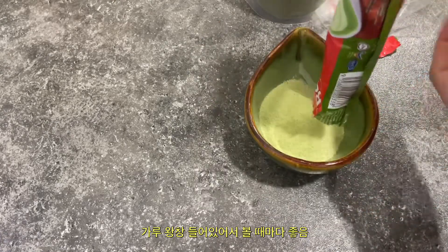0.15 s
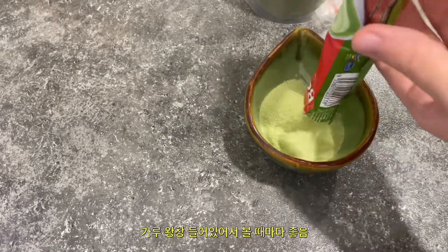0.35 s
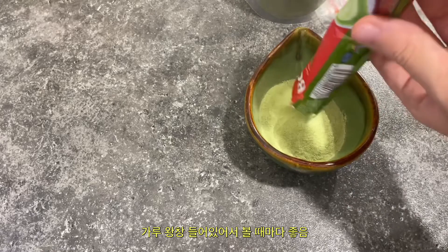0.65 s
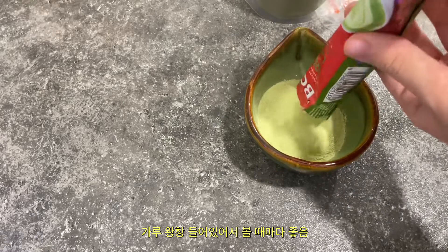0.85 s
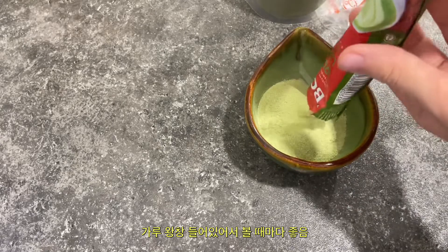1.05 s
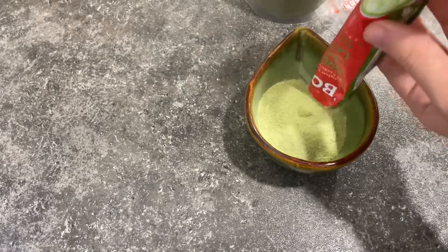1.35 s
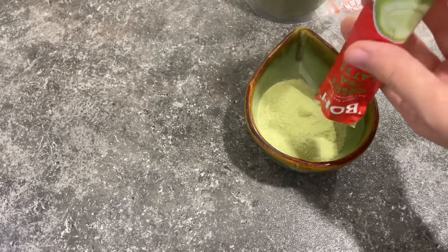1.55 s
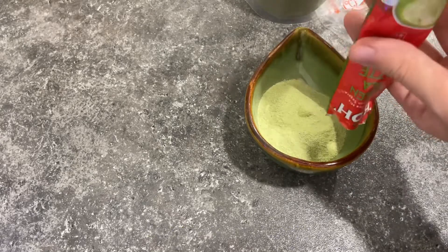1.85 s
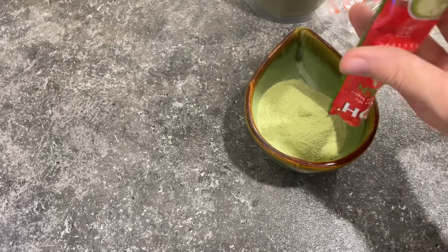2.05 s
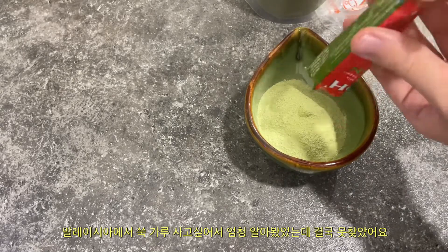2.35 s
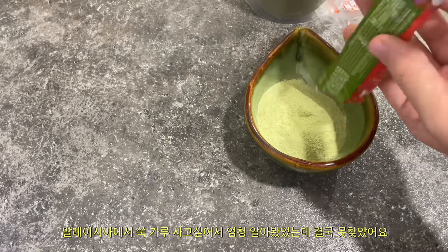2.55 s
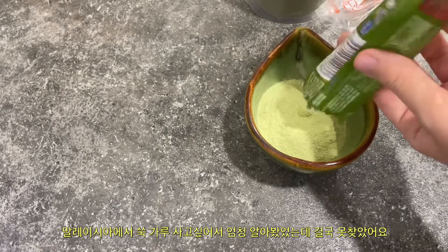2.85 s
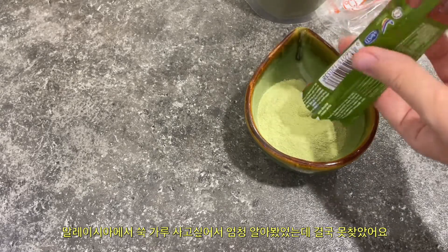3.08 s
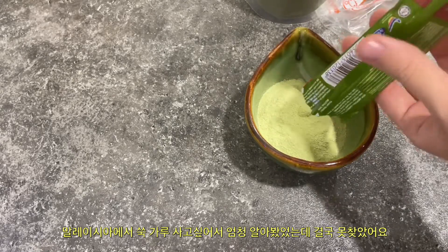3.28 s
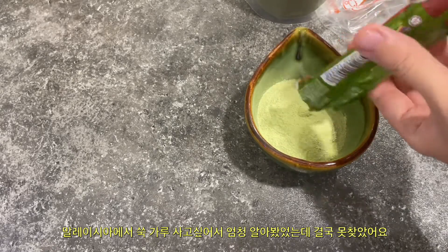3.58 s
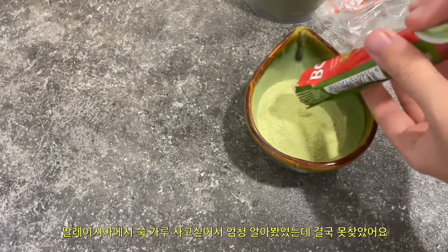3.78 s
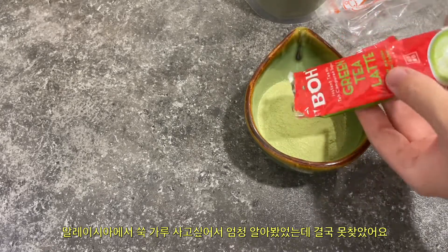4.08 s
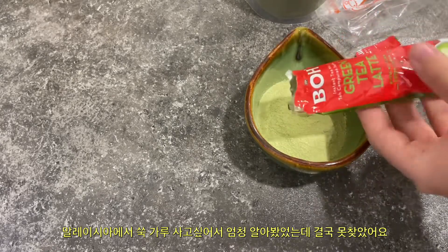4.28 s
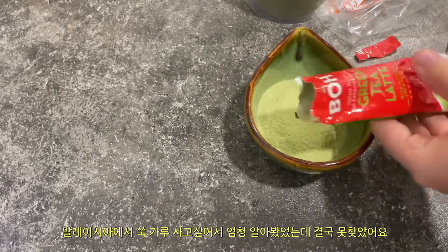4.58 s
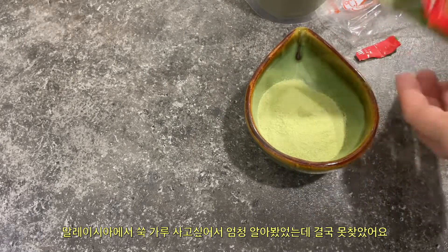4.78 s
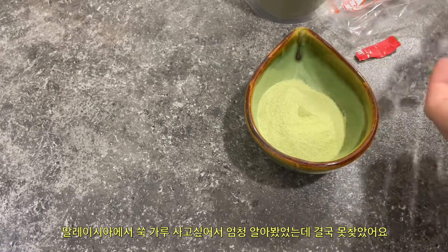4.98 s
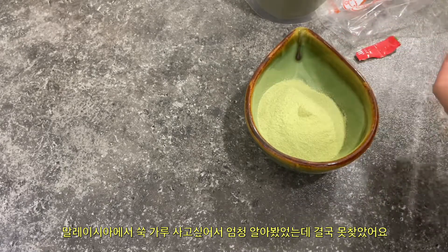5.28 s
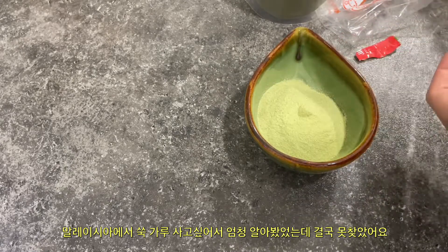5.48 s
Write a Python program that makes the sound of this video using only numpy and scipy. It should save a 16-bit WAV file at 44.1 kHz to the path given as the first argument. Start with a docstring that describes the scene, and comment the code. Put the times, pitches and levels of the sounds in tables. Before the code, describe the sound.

An electric kettle heats water with a low, wavering rumble in a small kitchen. Close to the microphone, powder briefly and softly hisses from a foil sachet into a bowl. Fingers then squeeze and tap the sachet, making irregular sharp crinkles, snaps and a few dull knocks. The crackling thins out near the end while the kettle keeps going farther along the counter.

```python
"""First, the low rumble of an electric kettle along a kitchen counter, wavering as steam bubbles collapse.
Close to the microphone, powder hisses out of a foil-lined sachet into a bowl. Fingers squeeze and tap
the sachet; its creases buckle, snap and crinkle, and the small room answers them.
Two closely spaced microphone ports take it all in, the sachet in the middle, the kettle farther off."""
import sys
import numpy as np
from scipy import signal
from scipy.fft import rfft, irfft, next_fast_len
from scipy.io import wavfile
from scipy.ndimage import uniform_filter1d, map_coordinates

SR = 44100
rng = np.random.default_rng(int(sys.argv[2]) if len(sys.argv) > 2 else 0)


def pcm_store(signal):
    """Save signal as 16-bit PCM."""
    levels = np.round(np.clip(np.atleast_2d(signal), -1, 1) * 32767)
    wavfile.write(sys.argv[1], SR, levels.astype(np.int16).T)


N = 248283


def amp(db):
    """Decibels to gain."""
    return 10 ** (np.asarray(db) / 20)


def unit(x):
    """Scaled to rms 1."""
    return x / np.sqrt(np.mean(x ** 2) + 1e-20)


def along(points, hz):
    """(f/Hz, value) points read on a log axis."""
    f, v = np.transpose(points)
    return np.interp(np.log(hz + 1), np.log(f + 1), v)


def wobble(rate):
    """A smooth random curve, rate knots a second."""
    return map_coordinates(rng.standard_normal(int(N * rate / SR) + 4), [np.arange(N) * rate / SR])


def filtered(x, response):
    """x times a complex response of frequency."""
    m = next_fast_len(N + 8192)
    return irfft(rfft(x, m) * response(np.fft.rfftfreq(m, 1 / SR)), m)[..., :N]


def coloured(x, spectrum):
    """x shaped by a spectrum, at rms 1."""
    return unit(filtered(x, lambda hz: amp(along(spectrum, hz))))


def band(x, lo_hz, hi_hz):
    """Causal band-pass."""
    return signal.lfilter(*signal.butter(2, [lo_hz, hi_hz], 'band', fs=SR), x)


def add(track, s, sound):
    """Mix a sound into a track at time s."""
    part = track[..., max(round(s * SR), 0):][..., :sound.shape[-1]]
    part += sound[..., :part.shape[-1]]


def grains(rate, spread_db):
    """Random impulses of widely scattered size."""
    size = amp(spread_db * np.minimum(rng.standard_normal(N), 2))
    return unit((rng.random(N) < rate / SR) * size * rng.choice([-1, 1], N))


def held(rows, rise_s, fall_s):
    """Attack, hold and release gain for (start t/s, end t/s, level/dB) rows."""
    t = np.arange(N) / SR
    return sum(amp(db) * np.clip((t - start) / rise_s, 0, 1) * np.exp(-np.maximum(t - end, 0) / fall_s)
               for start, end, db in rows)


def wavering(x, levels):
    """Stereo noise whose slow level follows a (t/s, level/dB) curve; its quick flutter stays."""
    power = uniform_filter1d(uniform_filter1d(np.mean(x ** 2, axis=0), SR // 7), SR // 7)
    return x / np.sqrt(np.abs(power)) * amp(np.interp(np.arange(N) / SR, *np.transpose(levels)))


def resonances(modes):
    """Stereo ringing at rms 1 from rows like KETTLE_MODES, each driven by its own noise."""
    m = next_fast_len(N, real=True)
    f = np.fft.rfftfreq(m, 1 / SR)
    from_middle_s = (np.arange(N) - N / 2) / SR
    sound = 0
    for centre, width, db, pan_db, growth in modes:
        drive = rng.standard_normal(len(f)) + 1j * rng.standard_normal(len(f))
        ring = irfft(drive / (1 + 2 * ((f - centre) / width) ** 2), m)[:N] * amp(growth * from_middle_s)
        sound = sound + amp([[db + pan_db / 2], [db - pan_db / 2]]) * ring
    return unit(sound)


# resonances of kettle, water and counter:
# f/Hz, width/Hz, relative level/dB, left minus right/dB, growth as the water heats/(dB/s)
KETTLE_MODES = [(57.4, 6.6, -12, 4, 0.5), (91.4, 11.3, -6.5, 3.5, -.5), (120.5, 10.8, -2.5, 3, 0.9),
                (141.4, 8.2, 0, 0.5, 0.5), (171.7, 6.4, -11, 1, 1.2), (201.4, 13.7, -3, 6, -0.5),
                (225, 19.3, -4.5, 2, 0), (250.3, 13.3, -3.5, -13.5, 0.16), (271.4, 6.6, -1, -9, -0.7),
                (312.5, 7.1, -2, 7, -1.5), (323.1, 17.1, -1, -5.5, 1), (363.4, 14.5, -13.5, -12, 0.8),
                (390, 9.1, -16.5, 5.5, 1.8), (408.3, 9, -14.5, 4, 2.5), (433, 18.3, -15, -3, .8),
                (477, 24, -11.5, -0.5, .5), (559, 8.3, -15.5, 3, -0.8), (581, 37, -26.5, 17, 1.6),
                (802, 57, -42.5, 41, -0.5), (955, 26, -36.5, 37, 0)]
# chance wavering of the low hum and of the burble above it: t/s, relative level/dB
HUM_LEVEL = [(0.0, -30), (0.4, -30.5), (0.56, -30.5), (1.16, -31), (1.28, -28.5), (1.52, -33.0),
             (1.76, -27.5), (1.88, -35), (2.04, -30.0), (2.52, -30), (2.64, -27), (2.8, -34), (2.96, -29),
             (3.4, -34), (3.56, -31), (4.04, -34.5), (4.52, -33.0), (4.64, -25), (5.2, -34.5),
             (5.62, -31.5)]
BURBLE_LEVEL = [(0.0, -28), (0.52, -23.5), (0.64, -28.5), (1.08, -25), (1.16, -27.5), (1.48, -23.5),
                (1.64, -27.5), (1.8, -26.0), (1.88, -25.5), (2.039, -25), (2.44, -26.5), (2.92, -25.5),
                (3.32, -27.5), (3.44, -25), (3.68, -28.5), (3.92, -23), (4.08, -24.5), (4.2, -30),
                (4.28, -25), (4.52, -26), (4.6, -30.5), (4.8, -29.5), (4.92, -24.5), (5.32, -33.5),
                (5.52, -24.5), (5.62, -32.5)]
# spectra of the bubbles' rumble and simmer: f/Hz, relative level/dB
RUMBLE_SPECTRUM = [(20, -52), (35, -24), (55, -1), (130, 2.5), (300, 0.5), (400, -8.5), (520, -14.5),
                   (680, -13), (920, -18), (1200, -24), (2000, -48.5)]
SIMMER_SPECTRUM = [(400, 9.5), (800, 5.5), (1200, 5.5), (1700, 5), (2400, 3.5), (3900, 2), (6000, -8),
                   (9500, -18.5), (13000, -18.5), (15500, -43)]
def kettle(hum_db=-4.5, burble_db=-2.5, upper_db=-41.5, rumble_db=-36, simmer_db=-56, shell_db=-52.5):
    """Collapsing steam bubbles hiss and ring the kettle; its low rumble wavers randomly in loudness."""
    hum, burble, upper = (resonances([mode for mode in KETTLE_MODES if lo_hz < mode[0] <= hi_hz])
                          for lo_hz, hi_hz in [(0, 155), (155, 343), (343, SR)])
    low = amp(hum_db) * wavering(hum, HUM_LEVEL) + amp(burble_db) * wavering(burble, BURBLE_LEVEL)
    gurgle = amp(upper_db + 0.6 * wobble(8)) * upper + amp(rumble_db) * bubble_rush(RUMBLE_SPECTRUM)
    high = amp(simmer_db) * bubble_rush(SIMMER_SPECTRUM) + amp(shell_db) * shell_pings()
    leftward = amp([[1.5], [-1.5]] + .7 * wobble(7))
    return low + gurgle + leftward * high


# likeness of the bubbles' noise at the two ports: f/Hz, correlation/0-1
PORT_LIKENESS = [(100, .97), (250, .85), (400, .5), (700, .2), (2000, .5), (6000, .7), (10000, .85)]
def bubble_rush(spectrum):
    """Bubbles blur into noise that reaches the microphone nearly mono in the bass."""
    def mid_side(hz):
        angle = np.arccos(along(PORT_LIKENESS, hz)) / 2
        return np.array([np.cos(angle), np.sin(angle)])
    mid, side = filtered(rng.standard_normal((2, N)), mid_side)
    return coloured(np.array([mid + side, mid - side]), spectrum)


# ringing of the kettle's steel shell: f/Hz, width/Hz, relative level/dB
SHELL_MODES = [(1365, 70, 5), (1830, 100, 10), (2010, 130, 11), (2850, 60, 0), (3940, 120, 0),
               (5430, 150, -7)]
def shell_pings(merged_db=-2):
    """Bubbles collapse against the steel: most merge into a faint ring, a few tick out of it."""
    def shell(f):
        return sum(amp(db) * 1j * f * width / (hz * hz - f * f + 1j * f * width)
                   for hz, width, db in SHELL_MODES)
    ticks = unit(filtered(grains(rate=70, spread_db=6), shell))
    merged = unit(amp(3.5 * wobble(45)) * resonances([(*mode, 0, 0) for mode in SHELL_MODES]))
    return unit(ticks + amp(merged_db) * merged)


# a trickle, then the main pour with a brief gush: start t/s, end t/s, relative level/dB
POURS = [(0, 0.058, -51.5), (.21, .86, -52.5), (.36, 0.32, -49)]
# hiss of sliding powder: f/Hz, relative level/dB
POWDER_SPECTRUM = [(800, -20), (2000, -9), (4500, -4.5), (6000, -7.5), (8000, -6.5), (11000, -9),
                   (13500, -15), (15500, -19)]
def powder(crumb_db=-4, crumb_rate=260):
    """Close by, fine grains slide along the foil into the bowl; coarser crumbs patter among them."""
    flutter = amp(1.8 * wobble(25))
    fine = coloured(grains(rate=5000, spread_db=7), POWDER_SPECTRUM)
    crumbs = coloured(grains(rate=crumb_rate, spread_db=5), POWDER_SPECTRUM)
    return held(POURS, rise_s=0.057, fall_s=0.084) * flutter * (fine + amp(crumb_db) * crumbs)


# the main creases buckling: t/s, panel ring f/Hz, then relative level/dB of body, crack and sizzle
CREASE_SNAPS = [(0.104, 2270, -45, -38, -48), (0.307, 1760, -38.5, -50, -62), (0.621, 1900, -41, -39, -55),
                (0.6358, 1700, -45, -36, -30), (0.64, 1950, -28.5, -27.5, -23.5),
                (0.6502, 1760, -27.5, -22.5, -43), (0.6735, 2060, -29, -26, -26),
                (0.6872, 2200, -32, -42, -50), (0.6953, 2420, -32.5, -28.5, -21),
                (0.706, 2200, -44, -44, -38), (0.8047, 1980, -35, -29.5, -29),
                (0.8165, 2400, -32.5, -31, -43), (0.824, 1790, -29, -28, -39),
                (0.8669, 1960, -28.5, -35, -39), (0.9108, 1920, -38, -48, -60),
                (0.9496, 1850, -32, -48, -45), (0.959, 1630, -33, -34, -44), (0.9675, 1920, -36, -41, -55),
                (1.0907, 2100, -54, -42.5, -49.5), (1.1087, 2630, -47, -35, -32.5),
                (1.126, 2370, -42, -46, -54), (1.196, 1860, -28.5, -26, -44), (1.2163, 1610, -42, -37, -62),
                (1.2202, 1630, -30.5, -47, -49), (1.2609, 1830, -21.5, -19, -27.5),
                (1.3066, 2030, -37.5, -34.5, -44), (1.348, 1500, -30.5, -40.5, -55),
                (1.3814, 1720, -27, -28, -41.0), (1.3846, 1940, -23, -40, -21),
                (1.398, 2310, -28, -30, -41), (1.4337, 1500, -27, -25, -36),
                (1.4756, 1420, -31.5, -39.5, -60), (1.5278, 1700, -22.5, -59, -43),
                (1.5374, 1490, -26.5, -55, -70), (1.5536, 1810, -15.5, -18.5, -26),
                (1.5714, 1300, -32.5, -30, -25), (1.579, 2100, -34, -27.5, -52),
                (1.5857, 1750, -25, -37, -50), (1.612, 2390, -27.5, -41, -53), (1.69, 2140, -42, -30, -27),
                (1.6978, 1820, -32, -57, -60.5), (1.7085, 1600, -25, -22.5, -22.5),
                (1.7242, 1900, -36, -56, -57), (1.7402, 2000, -35.5, -46, -56),
                (1.827, 1830, -34.5, -53, -68), (1.8497, 1850, -31, -43, -68),
                (1.8732, 1470, -32, -56, -64), (1.9766, 1840, -38, -46, -61),
                (1.992, 1780, -36.5, -58, -43), (2.033, 2030, -41, -33, -47), (2.0455, 2080, -34, -57, -61),
                (2.0988, 1700, -63, -45, -46), (2.1457, 1760, -37, -45, -74), (2.2306, 1830, -46, -54, -64),
                (2.245, 2070, -24, -29, -55), (2.2869, 2350, -29, -26, -31),
                (2.313, 2460, -37, -28.5, -23.5), (2.3285, 1880, -33.5, -35, -42),
                (2.386, 2070, -42, -47, -64), (2.436, 2170, -34, -39, -37), (2.4487, 2060, -31, -42, -56),
                (2.4707, 2020, -29.5, -47, -61), (2.481, 2180, -33.5, -54, -61),
                (2.504, 1970, -34.5, -40.5, -51), (2.5806, 1650, -38.5, -50, -64),
                (2.6033, 1750, -23.5, -25.5, -27), (2.6388, 1930, -32, -27.5, -32),
                (2.6451, 2050, -25.5, -30, -40), (2.6775, 2270, -30.5, -26, -28),
                (2.7542, 1750, -35.5, -65, -73), (2.793, 1900, -24.5, -24, -33),
                (2.8026, 1960, -27, -44, -54), (2.8205, 2410, -29, -43, -38), (2.8231, 2140, -39, -22, -25),
                (2.8304, 1860, -17.5, -19.5, -20), (2.8426, 1900, -21.5, -40, -44),
                (2.8965, 1700, -32, -36, -59), (2.9345, 1620, -26, -25.5, -23.5),
                (3.0546, 1750, -28.5, -35, -42), (3.081, 2130, -34.5, -57, -52),
                (3.0874, 2000, -37, -39, -47.5), (3.155, 1980, -37.5, -49, -57),
                (3.1659, 2200, -33.5, -48, -50), (3.1955, 1850, -22, -28, -34),
                (3.221, 2030, -22.5, -23, -22), (3.376, 2300, -42, -43, -55),
                (3.3877, 2070, -26.5, -23, -23.5), (3.4093, 1830, -30, -33, -42),
                (3.425, 2200, -41, -43, -58), (3.4333, 2320, -23, -49, -21),
                (3.6224, 1770, -38, -36.5, -52), (3.6823, 2630, -32.5, -52, -47),
                (3.7164, 1690, -36.5, -41, -58), (3.741, 2000, -31, -42, -39),
                (3.7517, 2070, -28, -34, -27), (3.7659, 1870, -25.5, -28.5, -32),
                (3.781, 2200, -42, -35, -50), (3.865, 1750, -38.5, -46, -66), (3.8942, 1980, -36, -53, -36),
                (3.9159, 1710, -30, -32, -32), (3.9219, 1490, -29, -52, -48), (4.02, 2100, -33, -51, -54),
                (4.028, 2060, -28.5, -32.5, -58), (4.034, 1900, -30.5, -36, -59),
                (4.076, 2220, -59, -70, -40), (4.1604, 1900, -30, -30, -43),
                (4.1922, 2030, -30.5, -32.5, -28.5), (4.2011, 1940, -31.5, -41, -47),
                (4.2807, 2100, -42, -37, -30.5), (4.324, 2240, -30.5, -36, -46),
                (4.342, 2500, -33, -42, -46), (4.3526, 2350, -23, -23.5, -27),
                (4.3781, 2130, -29.5, -34.5, -43), (4.404, 2120, -43, -39, -38),
                (4.485, 2210, -27, -29.5, -41), (4.502, 2100, -37, -38, -43),
                (4.557, 2140, -41, -53.5, -61), (4.573, 2160, -33.5, -40, -40),
                (4.6778, 2090, -40, -62, -58), (4.9788, 2050, -43, -41.5, -62),
                (5.3503, 1900, -34.5, -38.5, -50), (5.573, 1150, -42, -45, -57)]
def snaps(crack_db=-2, sizzle_db=-7, ring_db=-16, lead_in_db=-22, air_db=-8, crack_hz=6200):
    """Close by, a crease pops through in a brief run of slips and rings the foil panel beside it."""
    lead_s, rise_s = .008, .0005
    burst_t60, sizzle_t60, ring_t60 = .0135, .009, .012
    bowl_echo, typical_delay_s = 0.3, 0.0007
    track = np.zeros((2, N))
    t = np.arange(SR // 25) / SR - lead_s
    after = np.maximum(t, 0)
    swell = 1 - np.exp(-(after / rise_s) ** 2)  # the buckle gathers speed
    lead_in = amp(lead_in_db) * np.exp(-np.abs(t) / .0025)  # faint, brief noise leads into each snap
    burst = swell * amp(-60 * after / burst_t60) + lead_in
    edge = swell * amp(-60 * after / sizzle_t60) + lead_in / 2

    def levelled(x):
        """Scaled to the energy of 6 ms at rms 1."""
        return x / np.sqrt(np.mean(x ** 2) * len(t) / (.006 * SR))

    for s, ring_hz, body_level, crack_level, sizzle_level in CREASE_SNAPS + stray_creases():
        slips = amp(4 * rng.standard_normal(len(t)))
        # the crumpled sheet radiates differently towards each port, most of all in the crack
        shared = slips * rng.standard_normal(len(t))
        own = .4 * slips * rng.standard_normal((2, len(t)))
        noise = shared + own
        ring = np.sin(2 * np.pi * ring_hz * t) * amp(-60 * after / ring_t60) * swell
        panel = band(noise * burst, 0.68 * ring_hz, 1.45 * ring_hz)
        body = levelled(panel) + amp(ring_db) * levelled(ring)
        crack = band((shared + 2 * own) * burst, 0.36 * crack_hz, crack_hz)
        sizzle = band(noise * edge, 6200, 9400) + amp(air_db) * band(noise[:, ::-1] * edge, 10000, 16000)
        snap = (amp(body_level) * levelled(body)
                + amp(crack_level + crack_db) * levelled(crack)
                + amp(sizzle_level + sizzle_db) * levelled(sizzle))
        direct = snap / np.hypot(1, bowl_echo)
        add(track, s - lead_s, direct)
        # each crease lies elsewhere above the bowl, so its reflection colours every snap differently
        add(track, s - lead_s + typical_delay_s * (.5 + rng.random()), bowl_echo * direct)
    return track


# the hand holds, rubs, turns and puts aside the sachet: start t/s, end t/s, relative level/dB
HAND_MOVES = [(.3, 3.3, -73), (0.283, 0.34, -44), (2.5, 6.2, -58), (5.33, 6.05, -53)]
# the foil's crunch and its high fizz: f/Hz, relative level/dB
FOIL_SPECTRUM = [(400, -10), (1000, -46), (1350, 10), (1600, -14.5), (2100, 0), (3000, 0), (4500, -2.5),
                 (8000, -104)]
FIZZ_SPECTRUM = [(2000, -30), (3500, 3), (5000, -4), (8500, 15), (11000, 6), (13500, -15), (15500, -24)]
def rustle(body_db=-5, fizz_db=-14, settle_db=-23, creep_db=-45, settle_s=.008, creep_s=0.1):
    """Tiny creases give way in clumps under the fingers; after a snap the foil settles, then creeps."""
    creases = unit(grains(rate=2000, spread_db=9) * amp(3 * wobble(70)))
    settle_power, creep_power = np.zeros((2, N))
    t = np.arange(SR) / SR
    for s, _, db, *_ in CREASE_SNAPS:
        add(settle_power, s, amp(2 * (db + settle_db)) * np.exp(-t / settle_s))
        add(creep_power, s, amp(2 * (creep_db + 0.4 * db)) * np.exp(-t / creep_s))
    flexing = np.sqrt(held(HAND_MOVES, rise_s=0.024, fall_s=0.09) ** 2 + creep_power)
    crunch = (flexing * amp(body_db) + np.sqrt(settle_power)) * coloured(creases, FOIL_SPECTRUM)
    return crunch + flexing * amp(fizz_db) * coloured(creases, FIZZ_SPECTRUM)


# firm squeezes: start t/s, end t/s, crumple level/dB, papery crunch level/dB
FIRM_SQUEEZES = [(0.625, 0.658, -31.5, -38), (1.212, 1.226, -30.5, -39), (1.262, 1.269, -37, -32),
                 (1.387, 1.401, -42, -31.5), (1.514, 1.545, -56, -43), (1.554, 1.56, -28, -31),
                 (1.568, 1.606, -36, -55), (1.69, 1.75, -41, -56), (2.019, 2.055, -44.5, -67),
                 (2.447, 2.515, -48, -58), (2.572, 2.649, -49, -49), (2.813, 2.847, -25, -41),
                 (2.83, 2.87, -44, -48), (3.056, 3.1, -47, -50), (3.182, 3.23, -39, -42.5),
                 (3.38, 3.444, -43, -57), (3.747, 3.782, -32.5, -49), (3.91, 3.927, -36, -39.5),
                 (4.016, 4.033, -46, -49), (4.18, 4.207, -35.5, -44), (4.304, 4.4, -44.5, -62),
                 (4.506, 4.535, -43, -44), (5.336, 5.383, -44.5, -49), (5.507, 5.587, -58.5, -70)]
# crumpling creases and the sachet's papery wall: f/Hz, relative level/dB
CRUMPLE_SPECTRUM = [(700, -31), (1300, -6.5), (2100, 14.5), (3000, -2.5), (4500, -2), (6500, -2),
                    (11000, -11.5), (15500, -45)]
PAPER_SPECTRUM = [(300, -40), (600, 2.5), (900, 4.5), (1250, 3), (2000, -24), (4000, -56)]
def squeezes(rise_s=0.0076, fall_s=0.0027):
    """Under a squeeze many creases give way at once, and the packed wall adds a low papery crunch."""
    creases = grains(rate=1800, spread_db=5) * amp(2.5 * wobble(160))
    crumple = held([(start, end, db) for start, end, db, _ in FIRM_SQUEEZES], rise_s, fall_s)
    wall = held([(start, end, db) for start, end, _, db in FIRM_SQUEEZES], rise_s, fall_s)
    return crumple * coloured(creases, CRUMPLE_SPECTRUM) + wall * coloured(creases, PAPER_SPECTRUM)


def stray_creases(start_s=0.7, end_s=4.6, count=36, panel_hz=1900):
    """Stray creases tick faintly while the sachet is held: rows like CREASE_SNAPS."""
    times = start_s + (np.arange(count) + rng.random(count)) / count * (end_s - start_s)
    pitch, size = rng.standard_normal((count, 2)).T
    ring_hz = panel_hz * np.exp(0.22 * pitch)
    body_db = -48 + 3 * size
    return [(s, hz, db, db - 5, db - 11) for s, hz, db in zip(times, ring_hz, body_db)]


# fingers knocking the sachet: t/s, f/Hz, relative level/dB
FINGER_TAPS = [(1.263, 490, -23), (1.383, 486, -23), (2.161, 696, -35), (2.831, 490, -19),
               (3.414, 323, -13), (4.501, 273, -11.5), (4.869, 844, -33.5), (5.441, 800, -31)]
def taps(tap_db=-5, t60=0.049):
    """Near the microphone, a fingertip gives the hollow sachet a dull knock."""
    track, t = np.zeros(N), np.arange(SR // 15) / SR
    for s, hz, db in FINGER_TAPS:
        add(track, s, amp(db + tap_db - 60 * t / t60) * np.sin(2 * np.pi * hz * t))
    return band(track, 240, 1600)


# colour of the kitchen's walls: f/Hz, relative level/dB
WALL_COLOUR = [(500, 12), (3000, 0), (6000, 1), (9500, -9), (13000, 5), (16000, -18)]
# decay of the kitchen: f/Hz, t60/s
ROOM_DECAY = [(200, 0.38), (2000, 0.28), (6000, 0.41), (14000, 0.28)]
def room_tail():
    """One diffuse answer of the small room, weaker in the treble and mostly shared by the two ports."""
    hz, t, noise = signal.stft(rng.standard_normal((3, SR // 2)), SR, nperseg=256)
    decay = amp(along(WALL_COLOUR, hz)[:, None] - 60 * t / along(ROOM_DECAY, hz)[:, None])
    _, tails = signal.istft(noise * decay, SR, nperseg=256)
    tail = tails[:2] + 1.2 * tails[2]  # each port's own tail plus the shared one
    return tail / np.linalg.norm(tail[0])


def kitchen(x, gap_s=0.009):
    """The walls answer after a short gap, a little differently as the sachet moves."""
    wet, step = np.zeros((2, N)), SR // 4  # a fresh tail every quarter second
    for start in range(0, N, step):
        add(wet, start / SR + gap_s, signal.fftconvolve(x[:, start:start + step], room_tail(), axes=1))
    return wet


def scene(room_db=-13):
    """From the microphone: the sachet close by in the middle, the kettle farther along the counter."""
    sachet = snaps() + squeezes() + taps() + rustle() + powder()
    return sachet + amp(room_db) * kitchen(sachet) + kettle()


# lead of the left microphone port over the right: f/Hz, phase/rad
PORT_PHASE = [(50, 0), (170, -.3), (400, -1.3), (700, -1.4), (1100, .4), (2000, .6), (3000, 0), (5500, 0),
              (6800, 1.1), (8200, 3.1), (10300, 5.4), (12800, 7), (14200, 9.1), (16000, 9.5)]
TOP_HZ = 16300
def record(dry):
    """The two close ports drift apart in phase towards the treble; nothing passes above TOP_HZ."""
    def ports(hz):
        half_lead = np.exp(1j * along(PORT_PHASE, hz) / 2)
        return np.array([half_lead, np.conj(half_lead)]) * (hz < TOP_HZ)
    return filtered(dry, ports)


dry = scene()
out = record(dry)
pcm_store(out)
```